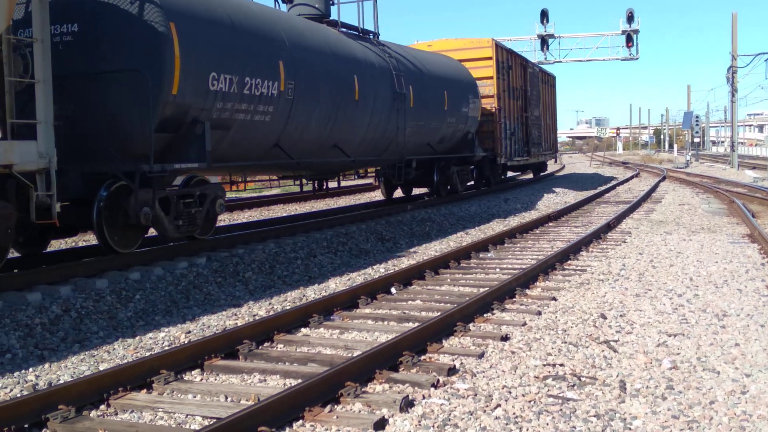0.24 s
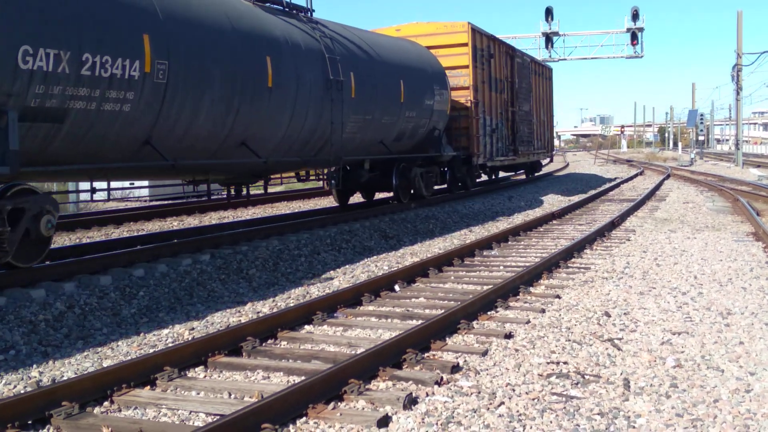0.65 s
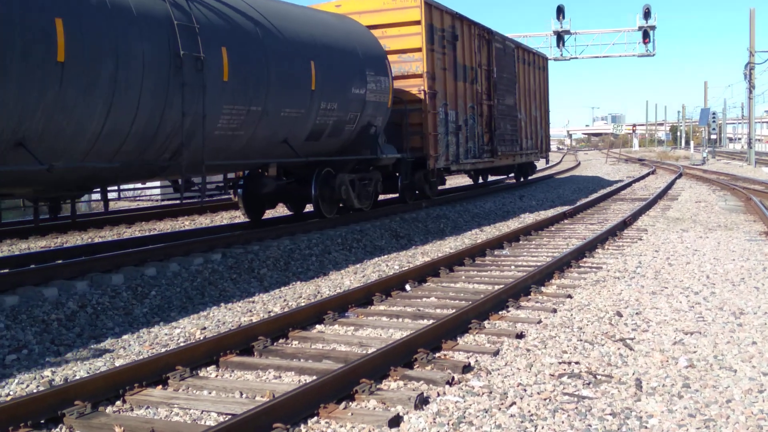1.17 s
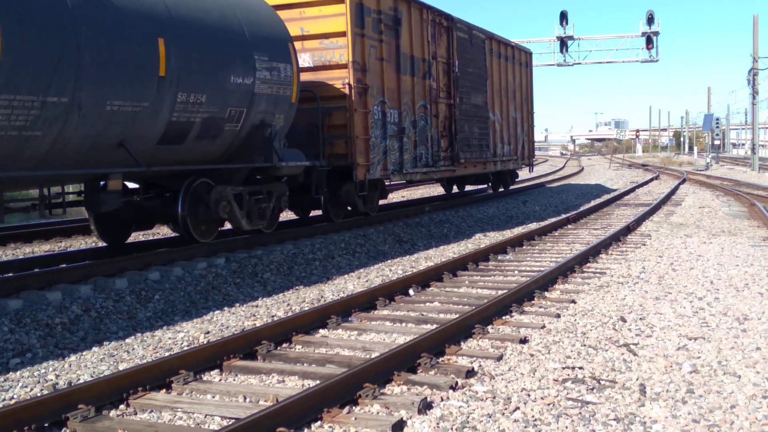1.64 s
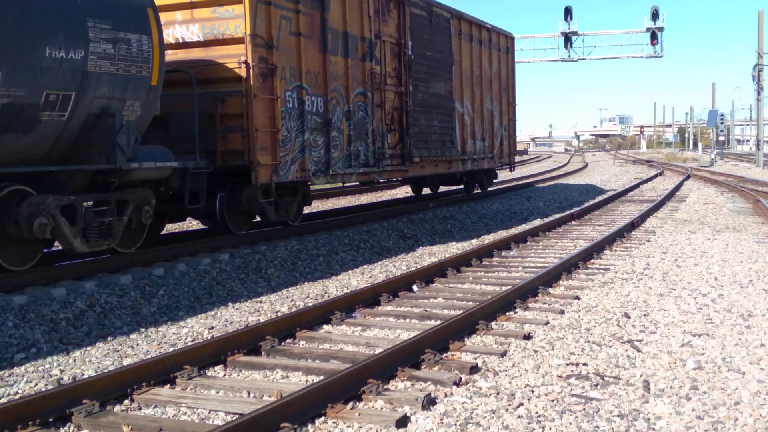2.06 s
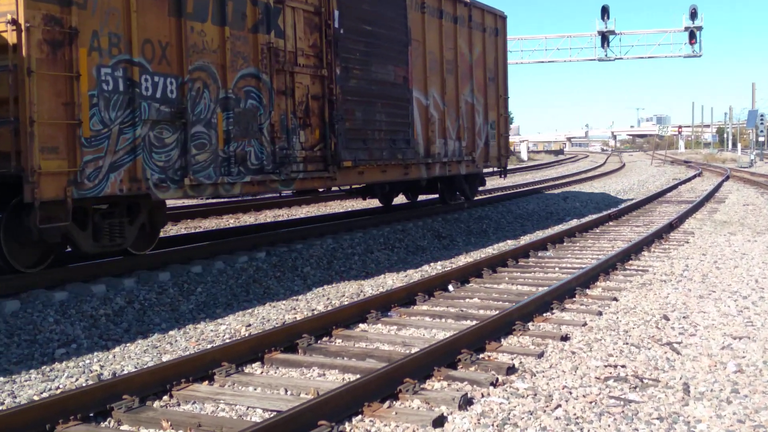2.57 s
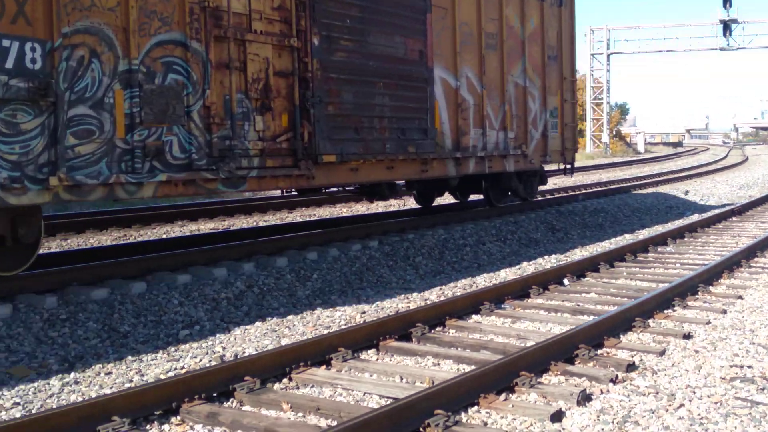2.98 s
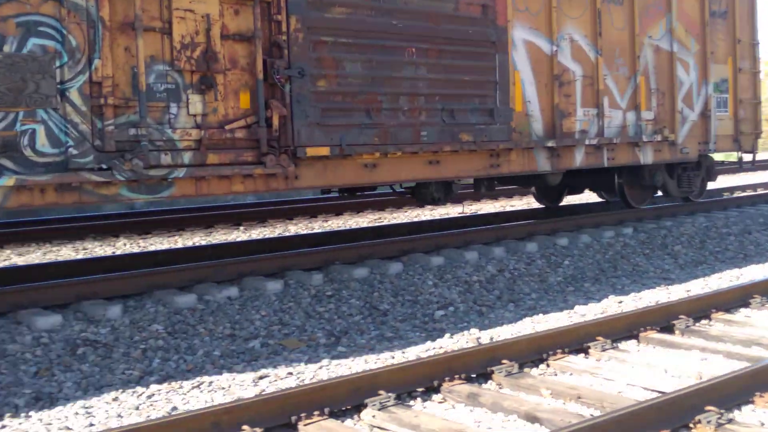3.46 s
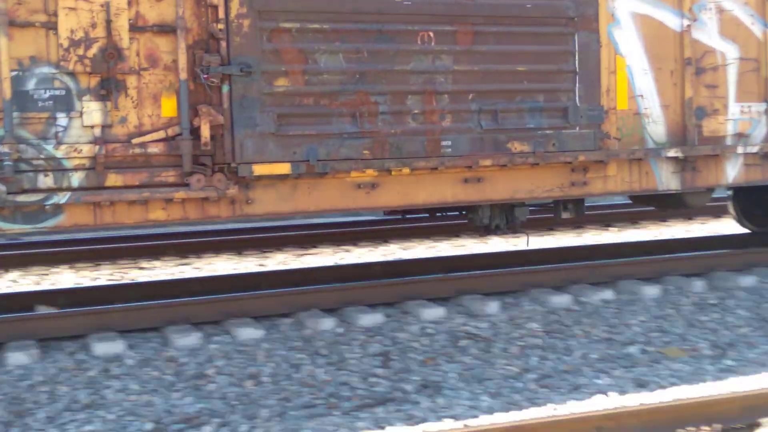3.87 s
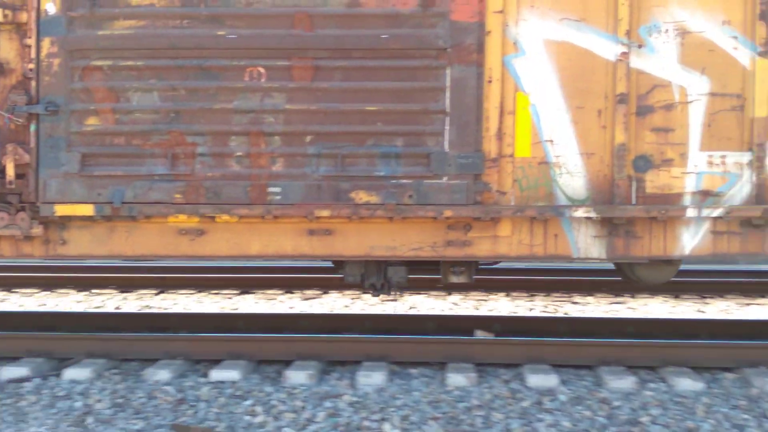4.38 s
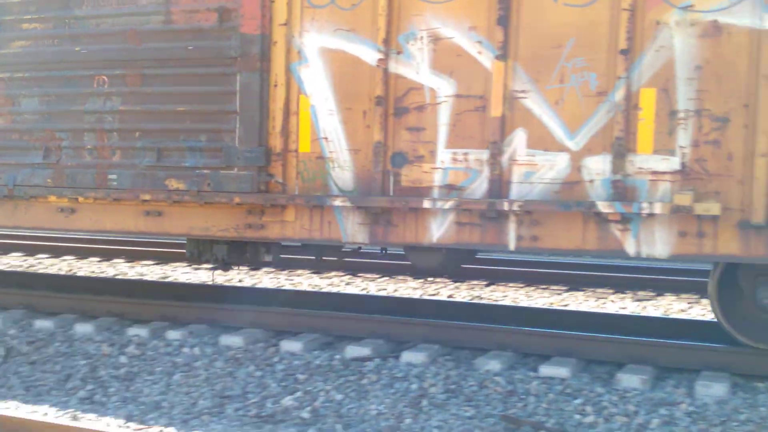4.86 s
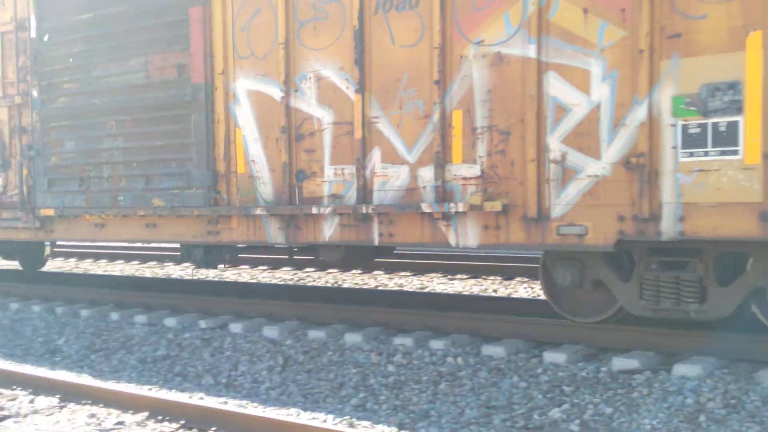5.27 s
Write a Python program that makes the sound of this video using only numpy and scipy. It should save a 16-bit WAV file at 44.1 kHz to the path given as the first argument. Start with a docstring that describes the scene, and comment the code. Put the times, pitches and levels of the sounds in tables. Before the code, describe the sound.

Steel wheels of a passing freight train bind in a bend. Quiet low rolling gives way to gritty flange scrapes and sizzling high screech, then a piercing, nearly steady-pitched squeal stuttering on and off. Soft low thumps and rattles mark rail joints. Near the end wind bumps the close trackside stereo microphone, a brief bright chirp cuts off, and only dim rumbling remains in open air.

```python
"""Freight cars in a tight curve

At the trackside, before a two-port microphone, one steel wheel sticks and slips, singing in spells at a rim mode.
Other flanges scrape: rubbing noise, raw and through rim resonances. At times rims lock onto steady tones.
Below lie lumpy rumble, rail noise and joint thumps, made of shaped noise and short damped pushes.
Near the end bell-shaped puffs of wind buffet the ports and the noise drops away."""
import sys
import numpy as np
from scipy import signal
from scipy.fft import rfft, irfft, next_fast_len
from scipy.io import wavfile
from scipy.ndimage import uniform_filter1d, map_coordinates

SR = 44100
rng = np.random.default_rng(int(sys.argv[2]) if len(sys.argv) > 2 else 0)


def waveform_to_disk(signal):
    """Save audio, clipped to [-1, 1], as 16-bit WAV at the path in sys.argv[1]."""
    frames = np.transpose(np.atleast_2d(signal))
    scaled = np.clip(frames, -1, 1) * 32767
    samples = np.round(scaled).astype(np.int16)
    wavfile.write(sys.argv[1], SR, samples)


N = 243873
TIME = np.arange(N) / SR
SIDES = np.array([[.5], [-.5]])  # shares a left-right difference between the ports


def amp(db):
    """Decibels as gain."""
    return 10 ** (np.asarray(db) / 20)


def unit(x):
    """x scaled to rms 1."""
    return x / np.sqrt(np.mean(x ** 2) + 1e-20)


def along(points, hz):
    """(frequency [Hz], level [dB]) points on a log axis, as gain."""
    f, v = np.transpose(points)
    return amp(np.interp(np.log(hz + 1), np.log(f + 1), v))


def curves(rows):
    """One value per sample for each column after the time."""
    s, *cols = np.transpose(rows)
    return [np.interp(TIME, s, c) for c in cols]


def during(rows):
    """1 while a table lasts, 0 outside, with soft edges."""
    inside = 1. * (TIME >= rows[0][0]) * (TIME <= rows[-1][0])
    return uniform_filter1d(inside, size=600)


def wobble(rate):
    """A smooth random curve, rate knots a second."""
    knots = rng.standard_normal(int(N * rate / SR) + 4)
    return map_coordinates(knots, [TIME * rate])


def filtered(x, response):
    """x times a response of frequency."""
    m = next_fast_len(N + 8192)
    return irfft(rfft(x, m) * response(np.fft.rfftfreq(m, 1 / SR)), m)[..., :N]


def rush(response, alike, lead_s, patchy_db):
    """Stereo noise of rms 1 in patches of random gain, partly shared; left leads by lead_s."""
    z = signal.stft(rng.standard_normal((2, N)), nperseg=512)[2]
    field = uniform_filter1d(rng.standard_normal(z.shape[1:]), size=7, axis=0)
    field = uniform_filter1d(field, size=9, axis=1)
    a, b = signal.istft(z * amp(patchy_db * unit(field)), nperseg=512)[1][:, :N]
    turn = np.arccos(np.clip(alike, -1, 1)) / 2  # mixing angle that gives the likeness of the ports
    pair = np.cos(turn) * a + np.sin(turn) * b * np.sign(SIDES)
    return unit(filtered(pair, lambda hz: response(hz) * np.exp(2j * np.pi * hz * lead_s * SIDES)))


def tone(hz, lead, drift_hz, rate, scatter, grit, grit_rate):
    """A self-excited mode of rms 1: pitch wavers, scattered paths differ by port, rough contact adds skirts."""
    phase = 2 * np.pi * np.cumsum(hz + drift_hz * wobble(rate)) / SR

    def chance(knots):
        """An independent complex random curve for each port."""
        return np.array([wobble(knots) + 1j * wobble(knots), wobble(knots) + 1j * wobble(knots)])

    shape = 1 + scatter * chance(rate) + grit * chance(grit_rate)
    return unit(np.real(shape * np.exp(1j * (phase + lead * SIDES))))


def swell(top_s, rise_s, hold_s, db, fall_db_per_s):
    """Gain that climbs 30 dB to its top, holds and dies away."""
    below_top = 30 * np.clip(top_s - TIME, 0, 9) / max(rise_s, .002)
    fallen = fall_db_per_s * np.clip(TIME - top_s - hold_s, 0, 9)
    return amp(db - below_top - fallen)


def squeal():
    """Stick-slip at the wheel's rim mode with its overtones; car sides and ballast scatter a blurred copy."""
    # lead of the left port as the wheel rolls by: (time [s], fundamental [rad], octave [rad])
    bearing = [(0, 2.5, 0), (1.2, 0, 0), (1.6, 1.2, 3.5), (2.1, -0.5, -4), (2.6, -2.5, -3), (3.3, -3, -7),
               (4.6, -3.5, -2.5)]
    # overtones of the slip cycle, relative levels: (time [s], octave [dB], octave left-right [dB],
    # third [dB], fourth [dB])
    overtones = [(1.65, -43, 2, -58, -65), (2.01, -38.5, 8, -71, -60), (2.63, -37, -13.5, -61, -45),
                 (2.85, -34, -8.5, -43, -42), (3.14, -33.5, -8, -34.5, -40), (3.27, -29.5, -27, -39.5, -24),
                 (3.5, -31, -13, -47.5, -58), (3.86, -28.5, -14, -35.5, -37),
                 (4.01, -38.5, -13.5, -41.5, -47.5), (4.51, -44, -2, -49, -47.5), (4.65, -59, -6, -47, -67)]
    hz, size, hum = spells()
    lead, octave_lead = curves(bearing)
    octave_db, pan_db, third_db, fourth_db = curves(overtones)

    main = tone(hz, lead, drift_hz=4.71, rate=40, scatter=0.14, grit=0.033, grit_rate=400)
    neighbour = tone(hz - 102, lead, drift_hz=4.77, rate=18, scatter=0.4, grit=0.072, grit_rate=240)
    main = main + amp(-26.5) * neighbour  # a nearby mode

    size = size + amp(-4.5) * hum
    lingering = uniform_filter1d(size, size=6000)
    blur = tone(hz, lead, drift_hz=7.845, rate=55, scatter=1.7, grit=0.22, grit_rate=180)
    blur = (amp(-14.0) * lingering.mean(axis=0) + amp(-6) * hum) * blur

    octave = tone(2 * hz, octave_lead, drift_hz=12.04, rate=68, scatter=0.86, grit=0.46, grit_rate=270)
    third = tone(3 * hz, 1.76, drift_hz=14.1, rate=80, scatter=0.64, grit=0.6, grit_rate=260)
    fourth = tone(4 * hz, 0.89, drift_hz=18.15, rate=110, scatter=1.0, grit=0.42, grit_rate=310)
    over = amp(octave_db + pan_db * SIDES) * octave
    over += amp(third_db + 5) * third
    over += amp(fourth_db + 6.5) * fourth
    # overtones follow the spells in part
    grip = np.abs(size[0] / (np.abs(lingering[0]) + amp(-80))) ** 0.19
    return size * main + blur + during(overtones) * grip * over


def spells():
    """Pitch and stereo size of the grip-and-slip spells, and size of the song between; level weighs the pitch."""
    # loud spells of the singing wheel: (start [s], length [s], left level at the start [dB],
    # pitch [Hz], left-right [dB])
    spell_rows = [(1.186, 0.026, -17.5, 1264, 15), (1.361, 0.037, -24, 1264, 4),
                  (1.41, 0.052, -20.5, 1274, 15), (1.463, 0.056, -21.5, 1272, 22),
                  (1.52, 0.05, -24, 1257, 9), (1.568, 0.057, -28.5, 1263, 15), (1.631, 0.13, -22, 1273, 14),
                  (1.743, 0.18, -17.5, 1260, 12), (1.924, .05, -15, 1279, 19), (1.98, 0.13, -20, 1266, 10),
                  (2.11, 0.042, -16, 1265, 8), (2.142, 0.065, -25.5, 1272, 8),
                  (2.226, 0.04, -15.5, 1280, 10.5), (2.291, 0.088, -18, 1296, 27),
                  (2.366, 0.092, -14.5, 1266, 14), (2.449, 0.09, -19.5, 1255, -1.5),
                  (2.6, 0.071, -24, 1265, 7), (2.683, 0.071, -14.5, 1255, 17), (2.747, 0.072, -9, 1270, 7),
                  (2.815, 0.12, -7.5, 1269, 1), (2.965, 0.033, -15, 1264, 12),
                  (3.002, 0.021, -11, 1260, 16), (3.05, 0.11, -8.5, 1266, 10), (3.152, 0.1, -9.5, 1263, 1),
                  (3.268, 0.046, -20, 1267, 7), (3.312, 0.066, -15.5, 1273, 11), (3.4, 0.1, -9, 1280, 17),
                  (3.521, 0.14, -14, 1259, 10), (3.674, 0.036, -12.5, 1266, 12),
                  (3.717, 0.039, -16.5, 1271, 19), (3.897, 0.1, -12.5, 1288, 5.5),
                  (4.001, 0.14, -10.5, 1272, 10), (4.145, 0.0625, -11, 1271, 4.5),
                  (4.243, 0.078, -12, 1269, 6), (4.329, .07, -21.5, 1264, 3), (4.405, .06, -19, 1262, 7.5),
                  (4.48, 0.068, -20.5, 1293, 5.5)]
    # faint song between the spells: (time [s], pitch [Hz], relative left level [dB], left-right [dB])
    hum_rows = [(0, 1252, -36, 11), (.3, 1256, -39, 0), (.55, 1252, -40, 6), (.7, 1252, -33, 1),
                (1.0, 1263, -29, 9.5), (1.4, 1258, -30, 8), (2.55, 1259, -29.5, 1), (3.1, 1269, -28.5, 6),
                (3.82, 1282, -26, 9), (4.53, 1290, -31, 10), (4.62, 1280, -51, 5)]
    grip_s, slip_s, sag_db_per_s = 0.017, 0.0216, 15  # swelling, letting go, sagging while held
    hum_hz, hum_db, hum_pan_db = curves(hum_rows)
    hum = during(hum_rows) * amp(hum_db - hum_pan_db * np.array([[0], [1]]))
    size = np.zeros((2, N))
    weight = hum[0] + amp(-90)
    pull = weight * hum_hz
    for s, length, db, hz, pan_db in spell_rows:
        held = np.clip(np.minimum((TIME - s) / grip_s, (s + length - TIME) / slip_s), 0, 1)
        shape = np.sin(held * np.pi / 2) * amp(db - sag_db_per_s * (TIME - s).clip(0, length))
        size = size + shape * amp([[0], [-pan_db]])
        weight = weight + shape
        pull = pull + shape * hz
    return uniform_filter1d(pull / weight, size=900), size, hum


def flanges():
    """Rubbing noise, heard raw and through the rim modes of the wheel in contact; the grip chatters."""
    # rim modes, a list for each stretch of contact: (frequency [Hz], width [Hz], relative level [dB])
    rim_modes = [
        [(5120, 120, -11.5), (5550, 40, -3.5), (5900, 79, -8), (6520, 73, -6.5), (7470, 56, -4.5),
         (8690, 160, -10.5)],
        [(5090, 44.3, 1.5), (6370, 600, -2.5), (7750, 120, -4), (8500, 43, 6.5), (9280, 42, 0.5),
         (9470, 27, -8), (10300, 50, -32), (11500, 32, -17), (12600, 39, -26)],
        [(5090, 26, -12), (5650, 30, -10), (6580, 100, -11), (7690, 22, -40), (8540, 250, -8.5), (9700, 43, -6),
         (10400, 23, -28), (11100, 62, -9), (11800, 83, -19.5), (12300, 200, -18)],
        [(5300, 19, -25), (6080, 305, 6.5), (6800, 33.7, 18.5), (7600, 60, 3.5), (8080, 122, -2),
         (9000, 29.2, 12), (9400, 43, -59), (11100, 84, -10), (12000, 43, -16.5)],
        [(4760, 22, -29), (5910, 64, 0), (6630, 45, -1), (6925, 51, -1), (7500, 38, -24), (7980, 150, 1.5),
         (8840, 27.6, 10), (9030, 81, 3), (11450, 35, -5), (13100, 28, -17), (14470, 140, -12),
         (15100, 33, -32)],
        [(2410, 170, 0), (5140, 240, -6), (5800, 210, -1), (7880, 120, 2), (8160, 410, -3), (9160, 320, -1.5)],
    ]
    # spectrum of scraping steel: (frequency [Hz], relative density [dB per Hz])
    grind_points = [(530, -49), (900, -11.5), (1150, -12.5), (1250, 0.5), (1500, -12.5), (2570, -11.5),
                    (4200, -12), (5010, -8), (7090, -3), (7540, 1), (11000, -28.5), (14300, -40),
                    (22000, -120)]
    # spectrum of the sizzle, a list for each stretch of contact: (frequency [Hz], relative density [dB per Hz])
    sizzle_points = [
        [(5760, -36), (9800, -7), (12600, 0), (15500, -5.5)],
        [(5760, -31), (9800, -6.5), (14000, 0), (15500, -16)],
        [(5760, -53), (9800, -4.5), (10500, -5), (15500, -4.5)],
        [(5590, -30), (9500, -6.5), (12600, -14.5), (15500, -21)],
        [(5760, -20), (9800, -8), (10600, -9.5), (15500, -8)],
        [(5760, -41), (9800, -7), (14000, -3), (15500, -12)],
    ]
    # scrapes: (top reached [s], rise [s], hold [s], relative level [dB], sizzle against that [dB])
    scrapes = [(0, .01, .005, -41, -11), (0.15, 0.05, 0.0046, -31.5, -13), (.377, .006, .004, -33, -4),
               (0.469, 0.02, 0.017, -27, -13), (0.533, .03, 0.08, -33, -29),
               (0.79, 0.0096, 0.052, -22.5, -8), (0.866, 0.049, 0.046, -25.5, -16),
               (0.936, 0.036, 0.03, -26, -10), (1.112, .007, 0.092, -19, -5),
               (1.256, 0.14, 0.16, -14.5, -6), (1.456, 0.077, 0.098, -15, -2.5),
               (1.584, 0.022, 0.0081, -33, 3), (2.545, 0.095, 0.055, -35, -25),
               (2.95, 0.046, 0.29, -29, -27.5), (3.239, 0.059, .04, -19.5, -6), (3.3, .03, 0.099, -27, -5),
               (3.513, .04, 0.036, -41, 0), (3.712, .08, 0.097, -20.5, -14),
               (3.843, 0.04, 0.045, -21.5, -5), (4.084, 0.047, 0.022, -25, -18),
               (4.133, 0.018, .01, -30, -13), (4.201, 0.047, 0.016, -34, 2.5),
               (4.358, .02, 0.015, -31, -11), (4.502, .02, .02, -34, -20),
               (4.702, 0.039, 0.023, -22.5, -14)]
    # light contact under the scrapes: (time [s], relative level [dB], sizzle against that [dB])
    light_rub = [(0, -61.5, 13), (.7, -40.5, -7), (1.1, -47, -6), (1.75, -39, -12), (2.45, -37, -9.5),
                 (2.9, -34, -11), (3.6, -31.5, -5.5), (4.3, -34, -2), (4.62, -39, 4), (4.67, -54, 6),
                 (5.08, -63, -1.5), (5.53, -55.5, -20)]
    # times at which the contact passes to the next stretch, each with its own colour: time [s]
    turns_s = [0, .74, 1.2, 2.439, 3.6, 4.67, 5.6]
    # for each stretch of contact: raw grinding, ringing rim and left-right, in dB
    grind_db, ring_db = (-5, -5.5, -7, -5, -5, -12), (0.5, 0.5, -3, -1.5, -0.5, -2.5)
    pans_db = (1.5, -1.5, 1.5, 0.5, 1.5, 1.5)

    out = np.zeros((2, N))
    grind = rush(lambda f: along(grind_points, f), alike=0.45, lead_s=-0.000395, patchy_db=3.0)
    chatter = amp(.9 * wobble(12) + .7 * wobble(150))
    rub_db, rub_sizzle_db = curves(light_rub)
    level, sizzle = amp(rub_db), amp(rub_db + rub_sizzle_db)
    for s, rise, hold, db, sizzle_db in scrapes:
        press = swell(s, rise, hold, db, fall_db_per_s=180)  # every scrape dies alike
        level = level + press
        sizzle = sizzle + press * amp(sizzle_db)

    wheels = zip(rim_modes, sizzle_points, grind_db, ring_db, pans_db, turns_s, turns_s[1:])
    for modes, fizz, raw_db, rim_db, pan_db, start, end in wheels:
        def rim(f):
            """Resonances of alternating sign."""
            return sum((-1) ** k * amp(db) * 1j * f * w / (c * c - f * f + 1j * f * w)
                       for k, (c, w, db) in enumerate(modes))

        ringing = rush(rim, alike=0.35, lead_s=-0.0004, patchy_db=4)
        hiss = rush(lambda f: along(fizz, f), alike=0.11, lead_s=-0.000418, patchy_db=4.0)
        rub = level * (amp(rim_db) * ringing + amp(raw_db) * grind)
        rub += sizzle * amp(2.0) * hiss
        out += during([[start], [end]]) * amp(pan_db * SIDES) * chatter * rub
    return out


def bites():
    """A short broad crack, decaying noise, where a flange first touches."""
    # a flange bites the rail head: (time [s], relative level [dB])
    bite_rows = [(0.374, -14.5), (0.7916, -11), (1.114, -14.5)]
    points = [(300, -5.0), (1500, 9.0), (9000, 4.5), (15000, -32)]
    # each falls 60 dB in 0.095 s
    burst = sum(amp(db - 11 - 60 * np.clip(TIME - s, 0, 1) / 0.095) * (TIME >= s) for s, db in bite_rows)
    return burst * rush(lambda f: along(points, f), alike=0.87, lead_s=-0.000094, patchy_db=0.5)


def locked(modes, **rough):
    """Modes of one wheel that oscillate by themselves while the contact holds."""
    return sum(swell(*shape) * amp(pan_db * SIDES) * tone(hz, lead, **rough)
               for hz, *shape, lead, pan_db in modes)


def rolling():
    """Car bodies rumble in lumps, the rail hisses, joints give damped low pushes with a rattle."""
    # rolling: (time [s], relative rumble level [dB], relative rail noise level [dB])
    roll = [(0, -35.5, -51.5), (1.05, -33.5, -50), (1.43, -36.5, -73), (1.75, -37, -45.5),
            (2.36, -39.5, -48), (2.94, -38, -40), (3.28, -41, -51), (3.5, -39.5, -45), (4.1, -43, -45.5),
            (4.4, -33.5, -44), (4.77, -39.5, -55.5), (5.53, -43, -60)]
    # spectrum of the car bodies: (frequency [Hz], relative density [dB per Hz])
    rumble_points = [(13, -53.5), (22, -29), (53, -5.5), (75, 2.5), (124, -6), (198, -3.5), (292, -11.5),
                     (336, -8), (501, -20.5), (600, -18.5), (780, -18), (1320, -120)]
    # spectrum of the rail: (frequency [Hz], relative density [dB per Hz])
    rail_points = [(260, -23), (450, -20), (681, -8), (1430, -3), (1710, -4.5), (1920, -5.5), (2130, -3),
                   (3580, -12.5), (4960, -9), (8700, -15.5), (15500, -36)]
    # a broad resonance of the rail: (centre [Hz], width [Hz], lift [dB])
    girder = (898, 180, 6.8)
    # cars thump over rail joints: (time [s], relative level [dB], pitch [Hz], left-right [dB],
    # relative rattle level [dB])
    thumps = [(1.472, -22, 79.5, -6, -25), (2.209, -30.5, 77, 3, -22), (2.348, -23, 78.3, 2.5, -17),
              (2.719, -40, 259.5, -1.0, -7), (2.931, -28, 345.4, 3, 5.5), (3.051, -32, 80.45, 6, 3),
              (3.349, -34, 79.9, 9, -18), (3.486, -31, 173, 9, -8), (4.803, -28.5, 301, -10, 2.5),
              (5.115, -27.5, 72.7, 4, -17)]
    rumble_db, rail_db = curves(roll)
    rumble = rush(lambda f: along(rumble_points, f), alike=.88, lead_s=-0.0003, patchy_db=1.5)
    out = amp(rumble_db + 0.5 + 1.42 * wobble(9)) * rumble

    centre, width, lift_db = girder

    def rail(f):
        """Rail spectrum with its broad resonance."""
        return along(rail_points, f) * amp(lift_db / (1 + (2 * (f - centre) / width) ** 2))

    rail_noise = rush(rail, alike=0.097, lead_s=-0.00018, patchy_db=4.0)
    out += amp(rail_db + 9.5 + 0.87 * wobble(7.7)) * rail_noise

    rattle_points = [(60, -34), (200, 1.5), (500, -4), (1500, -25), (5000, -93.5)]
    rattle = rush(lambda f: along(rattle_points, f), alike=0.9, lead_s=-0.00023, patchy_db=3)
    for s, db, hz, pan_db, rattle_db in thumps:
        age = np.clip(TIME - s, 0, 1)
        cycles = age * hz ** 0.78 * 2.74  # sets the length of the push; higher pitches die sooner
        push = cycles * np.exp(-.9 * cycles) * np.sin(2 * np.pi * hz * age)
        out += amp(db + 8 + pan_db * SIDES) * push
        shake = amp(db + rattle_db - 6 + pan_db * SIDES - 60 * age / 0.14)
        out += shake * (1 - np.exp(-age / .003)) * rattle
    return out


def gust():
    """Lumpy turbulence, mostly unrelated at the ports, in bell-shaped puffs that also shove the diaphragm."""
    # puffs of wind on the ports: (centre [s], half length [s], relative level at the nearer port [dB],
    # left-right [dB], shove [Hz])
    puffs = [(4.212, .025, -19, 19, 85), (4.274, 0.023, -21, 20, 261), (4.368, 0.063, -17.5, 26, 90),
             (4.392, 0.018, -18.5, 27, 90.9), (4.475, .02, -21, 14, 168.8), (4.546, 0.041, -28.5, 1, 200),
             (4.62, 0.013, -17.5, -20, 110), (4.841, .03, -34, 3, 202)]
    # spectrum of the buffeting: (frequency [Hz], relative density [dB per Hz])
    buffet = [(12, -48), (20, -23), (75, 2), (205, -3.5), (419, -13), (654, -40), (900, -18.5), (1170, -57),
              (1980, -120)]
    lumps = amp(2.2 * np.array([wobble(35), wobble(30)]))
    swirl = unit(lumps * rush(lambda f: along(buffet, f), alike=0.22, lead_s=0, patchy_db=2.5))
    out = np.zeros((2, N))
    for s, half, db, pan_db, shove_hz in puffs:
        bell = np.exp(-((TIME - s) / half) ** 2)
        shove = amp(-2) * np.cos(2 * np.pi * shove_hz * (TIME - s))
        out += amp(db + pan_db * SIDES - abs(pan_db) / 2) * bell * (swirl - shove)
    return out


def scene():
    """Locked rims, singing wheel, scraping flanges, rolling cars and wind, summed at the two ports."""
    # a rim locks onto two modes and a tone near their difference: (frequency [Hz], top reached [s],
    # rise [s], hold [s], level [dB], fall [dB/s], left leads [rad], left-right [dB])
    lock = [(7670, 1.27, 0.11, 0.095, -12, 75, -1.37, 4), (7750, 1.498, .1, 0.048, -14.5, 200, -1.7, 1),
            (5670, 1.266, 0.1, .13, -19, 200, -1.5, 7.5), (5660, 1.48, .1, 0.082, -24, 250, -3.5, 7),
            (2004, 1.25, 0.085, 0.026, -23.5, 81, 0, -1.5), (1986, 1.5, 0.033, 0.028, -23, 350, 0.5, 1)]
    # the last wheel chirps and rings out: (frequency [Hz], top reached [s], rise [s], hold [s],
    # level [dB], fall [dB/s], left leads [rad], left-right [dB])
    chirp = [(2175, 4.69, 0.014, 0.051, -20, 197, 0.82, -1.2), (2172, 5.5, .03, .01, -52, 64, 0, -1),
             (1710, 4.77, 0.19, 0.025, -38.5, 44, 0.0025, 2.7),
             (8806, 4.715, 0.051, 0.026, -17.5, 390, 0.93, 2.2),
             (4355, 4.7, 0.013, 0.05, -40.5, 76, 0.43, 0.38), (5270, 4.7, .015, .06, -43.5, 110, 0.24, 1.5),
             (5820, 4.7, .015, 0.087, -40, 170, 0.14, 1)]
    # a low rim mode that answers the passing wheels: (frequency [Hz], top reached [s], rise [s],
    # hold [s], level [dB], fall [dB/s], left leads [rad], left-right [dB])
    drone = [(2160, 3.63, 1.2, 0.049, -37, 50, 0, -7), (2125, 4.53, 0.16, 0.1, -41, 230, 0.0085, 1)]
    wheels = locked(lock, drift_hz=7.95, rate=110, scatter=0.13, grit=0.56, grit_rate=380)
    wheels += locked(chirp, drift_hz=11.8, rate=49, scatter=0.47, grit=0.59, grit_rate=300)
    wheels += locked(drone, drift_hz=39.76, rate=80, scatter=1.0, grit=0.99, grit_rate=270)
    return wheels + squeal() + flanges() + bites() + rolling() + gust()


def record(dry):
    """The loudest peaks are flattened at a fixed level; nothing is kept above the band limit."""
    clip, top_hz = .8, 15660  # clip level is a fraction of full scale
    return filtered(np.clip(dry, -clip, clip), lambda hz: hz < top_hz)


dry = scene()
out = record(dry)
waveform_to_disk(out)
```